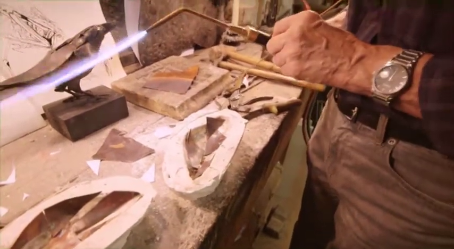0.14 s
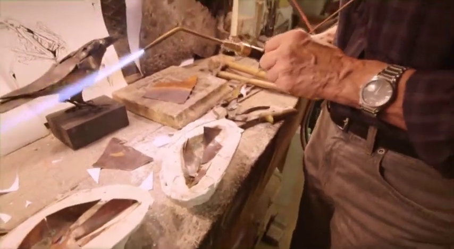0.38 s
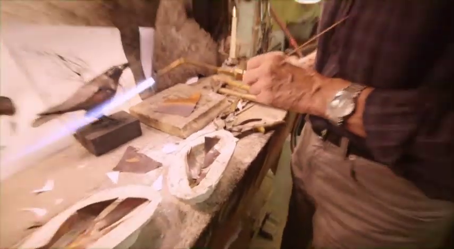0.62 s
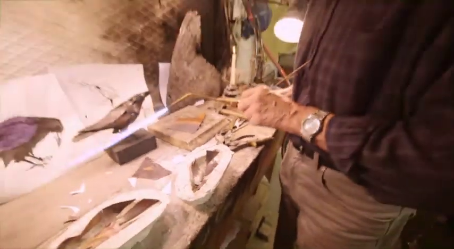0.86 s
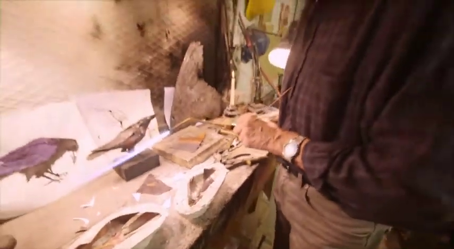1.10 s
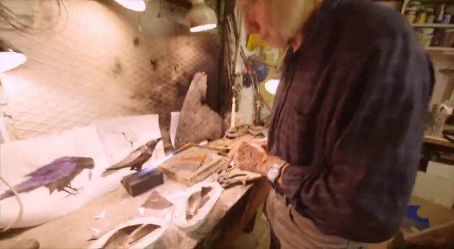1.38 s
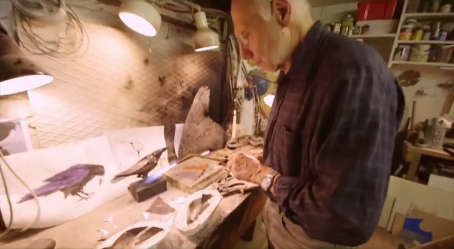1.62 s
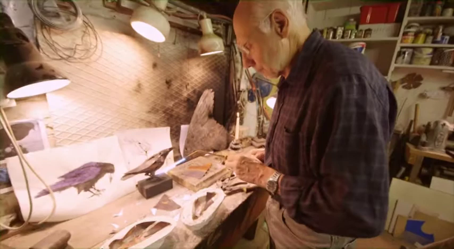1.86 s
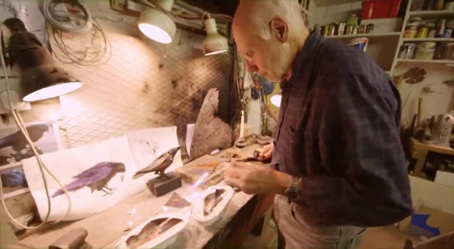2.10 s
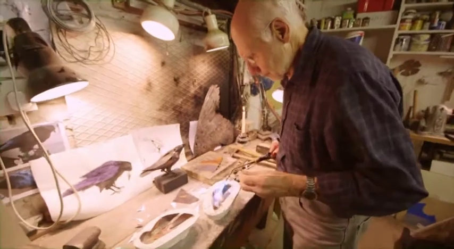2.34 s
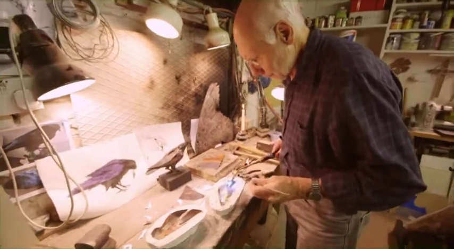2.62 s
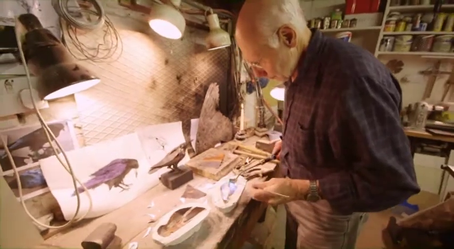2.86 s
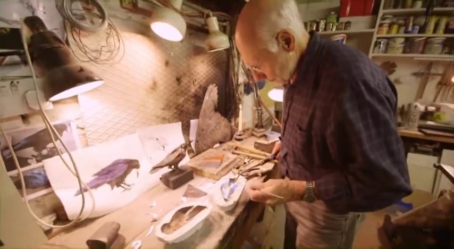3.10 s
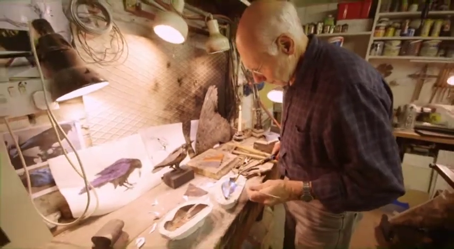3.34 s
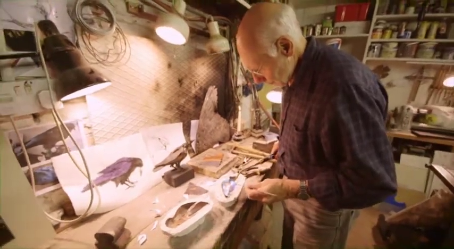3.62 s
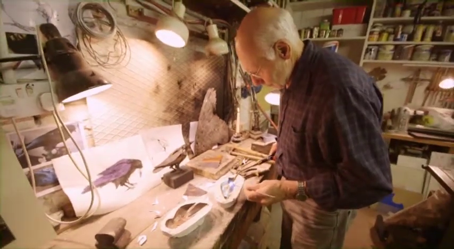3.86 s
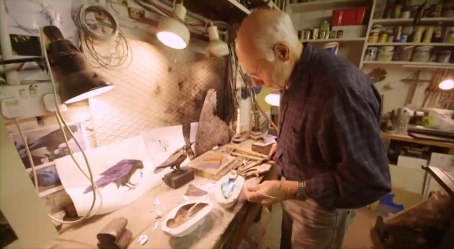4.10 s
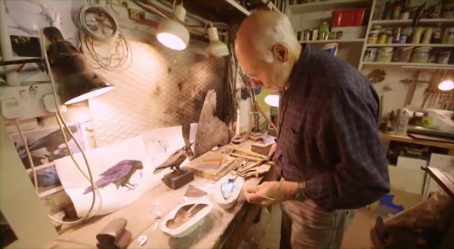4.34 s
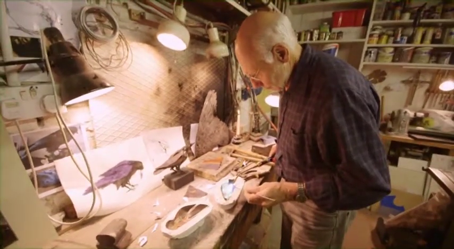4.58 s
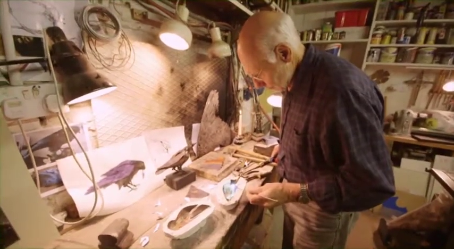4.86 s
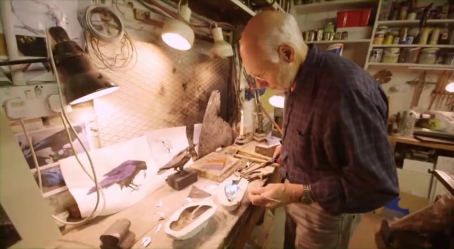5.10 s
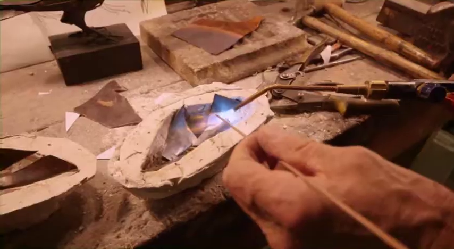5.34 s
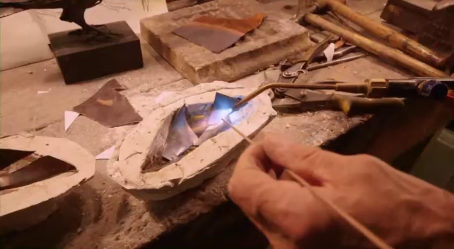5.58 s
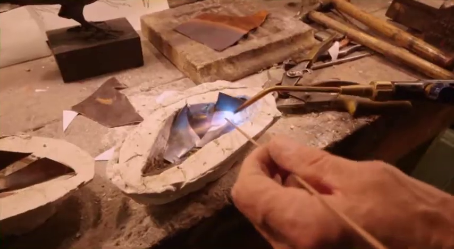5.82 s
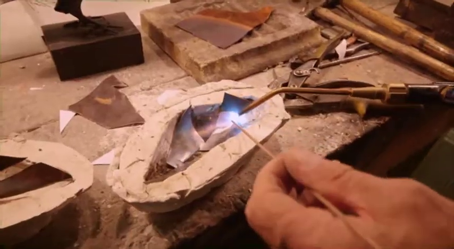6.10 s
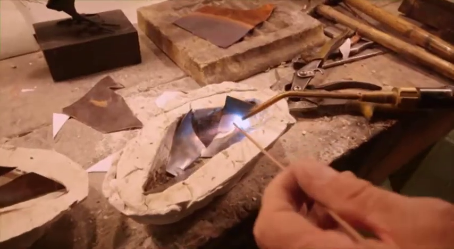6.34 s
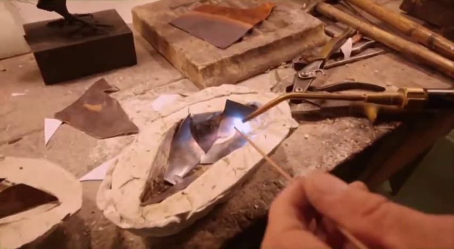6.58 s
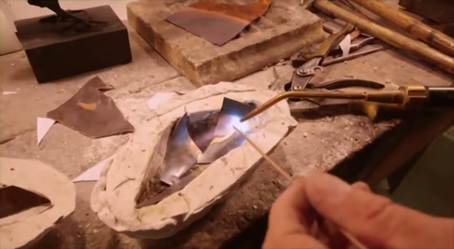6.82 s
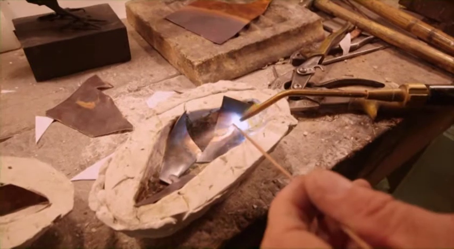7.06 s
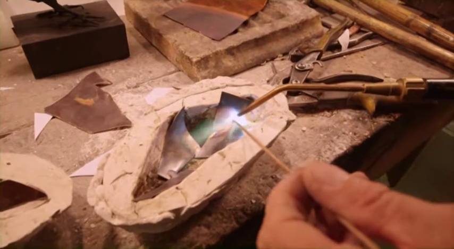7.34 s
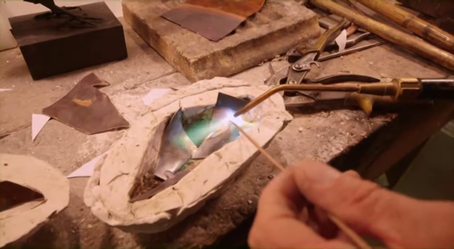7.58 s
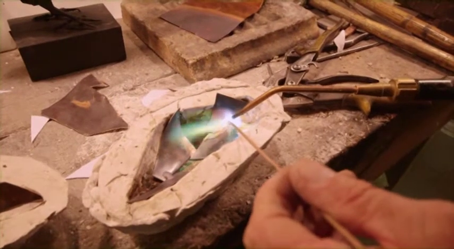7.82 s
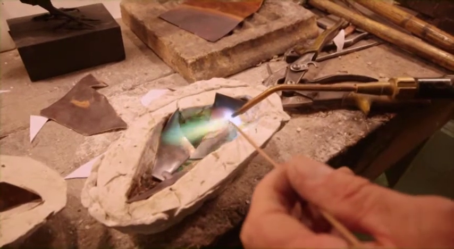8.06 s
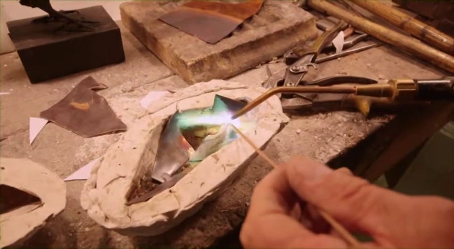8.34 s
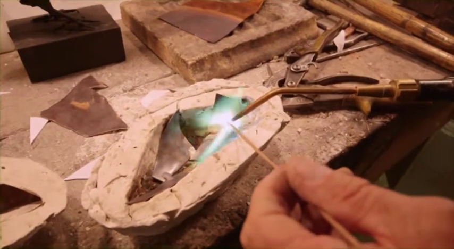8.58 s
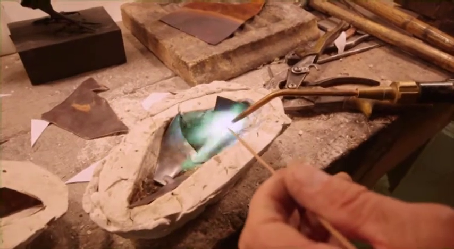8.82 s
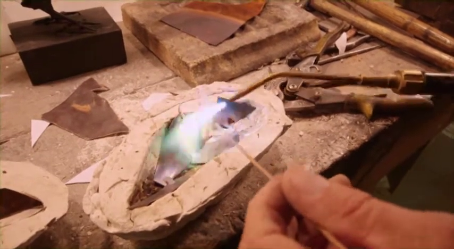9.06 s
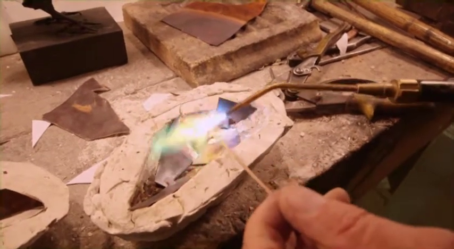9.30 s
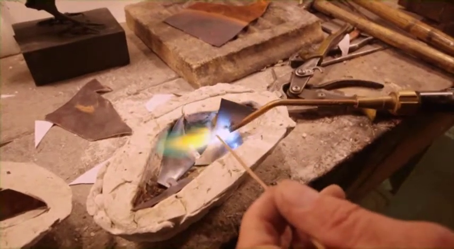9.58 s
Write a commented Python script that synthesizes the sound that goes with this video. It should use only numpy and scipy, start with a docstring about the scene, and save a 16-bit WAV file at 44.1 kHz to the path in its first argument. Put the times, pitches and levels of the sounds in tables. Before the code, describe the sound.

Close in a small, dry workshop, a gas torch burns without pause: a rough, fine buzz of about 265 ticks a second within bright hiss, over lumpy low rumble. Near 0.95 s a soft low thump and faint pop. At 1.4 s the flame leaps into a loud, throbbing roar, deep body and airy edge together, its edge brightening before it breaks off near 2.5 s. Gas then rushes into a hollow thin-metal shell, its resonance gliding up and back; sharp cracks and sputters cluster at 3.0-3.7 s, scatter around 4.0-4.3 s, and cluster again at 4.65-4.85 s, followed by low thumps and dull plops near 5 s. The rush fades by 5.9 s, leaving quieter buzzing hiss and rumble, with a deep hum slowly swelling. From 8.3 s the flame brushes the rim: plops, thumps, crackle, snaps around 8.75 s and a strong crack at 8.94 s. Softer hiss and small plops continue to 9.7 s.

```python
"""A gas torch burns close by on a workshop bench: a fine buzz of ticks over hiss and a low rumble of noise.
At 1.4 s the flame sweeps the bench in a throbbing two-band roar, then from 2.5 s plays into a hollow shell
of thin metal: resonant noise rushes, clumped bursts sputter, and sharp cracks pop over short rings.
From 6 s buzz and rumble carry on under a swelling hum; after 8 s the flame brushes the rim, with more pops.
Now and then come soft low thumps, a few sagging sine cycles each, and dull plops of molten metal."""
import sys
import numpy as np
from scipy import signal
from scipy.io import wavfile
from scipy.ndimage import uniform_filter1d

SR = 44100
rng = np.random.default_rng(int(sys.argv[2]) if len(sys.argv) > 2 else 0)


def file_out(sig):
    """Save sig as 16-bit WAV at sys.argv[1]."""
    # one column per channel
    cols = np.atleast_2d(sig).T
    # limit, then scale
    lim = np.clip(cols, -1, 1)
    pcm = np.round(lim * 32767).astype(np.int16)
    wavfile.write(sys.argv[1], SR, pcm)


def voltage_ratio(decibels):
    """Convert decibels (scalar or array-like) to amplitude ratios, 20 dB per decade."""
    exponent = np.asarray(decibels, float) / 20
    return 10 ** exponent


N = 427329  # length in samples


def evened(x):
    """Scales a sound to rms 1."""
    return x / np.sqrt(np.mean(x ** 2) + 1e-20)


def add(mix, start_s, sound):
    """Mixes a sound in at start_s, cut at the end of the mix."""
    part = mix[round(start_s * SR):][:len(sound)]
    part += sound[:len(part)]


def curve(rows, column=1, silent=None):
    """Draws one column of a table sample by sample; silent replaces the end values outside it."""
    rows = np.transpose(rows)
    return np.interp(np.arange(N) / SR, rows[0], rows[column], silent, silent)


def spell(start_s, end_s, rise_db_per_s, fall_db_per_s):
    """Attack, hold and release in dB: 0 from start to end, sloping away on both sides."""
    t = np.arange(N) / SR
    slopes = np.minimum((t - start_s) * rise_db_per_s, (end_s - t) * fall_db_per_s)
    return np.maximum(np.minimum(0, slopes), -120)


def shape(points, modes=()):
    """Minimum-phase impulse response of a colour curve, lifted by resonances; energy 1."""
    hz = abs(np.fft.fftfreq(4096, 1 / SR))
    point_hz, point_db = np.transpose(points)
    lift = 1 + sum(voltage_ratio(db) / (1 + ((hz - centre) / width * 2) ** 2) for centre, width, db in modes)
    colour_db = np.interp(np.log(hz + 1), np.log(point_hz + 1), point_db)
    log_gain = np.log(voltage_ratio(np.maximum(colour_db, -100)) * lift)
    taps = np.fft.ifft(np.exp(np.conj(signal.hilbert(log_gain)))).real[:2048]
    return taps / np.linalg.norm(taps)


def through(x, taps):
    """Convolution cut to the length of the scene."""
    return signal.oaconvolve(x, taps)[:N]


def resonate(x, hz, width_hz):
    """A gliding resonance: shifts the curve hz down to zero, smooths, and shifts back."""
    turn = np.exp(2j * np.pi * np.cumsum(hz) / SR)
    r = np.exp(-np.pi * width_hz / SR)
    return 2 * (turn * signal.lfilter([1 - r], [1, -r], x / turn)).real


def wander(hz):
    """Slow random curve of rms 1, moving at up to about hz."""
    return evened(signal.lfilter(*signal.butter(2, hz, fs=SR), rng.standard_normal(N)))


def flutter(hz, db):
    """Random gain wandering at up to about hz, by db rms."""
    return evened(voltage_ratio(db * wander(hz)))


def grit(per_s, spread_db):
    """Sparse clicks of random sign, a few of them large; rms 1."""
    size = voltage_ratio(spread_db * np.minimum(rng.exponential(1, N), 4)) * rng.choice([-1., 1.], N)
    return evened(size * (rng.random(N) < per_s / SR))


def room(x, t60_s):
    """Short, cluttered workshop: a dense decaying noise tail after a 4 ms gap."""
    t = np.arange(SR // 2) / SR
    tail = rng.standard_normal(len(t)) * voltage_ratio(-60 * t / t60_s) * (t > .004)
    return through(x, tail / np.linalg.norm(tail))


ROAR_START_S = 1.414
# Level of the rumble noise: start_s [s], level_db [dB]
RUMBLE_LEVEL = [(0, -34), (1.38, -35), (2.62, -33), (2.74, -37), (3.4, -40.5), (3.9, -37.5), (4.6, -38),
                (4.9, -32.5), (6.14, -39.5), (7.96, -36), (8.62, -31.5), (8.84, -37.5), (9.1, -38),
                (9.3, -39), (9.59, -37.5), (9.69, -45.5)]
# Colours of the rumble, free flame then flame on the work: freq_hz [Hz], level_db [dB, relative]
RUMBLE_COLOURS = [
    [(15, -45), (25, -8), (129, -5.5), (401, -18.5), (459, -21.5), (649, -17.5), (883, -26), (1270, -18.5),
     (2500, -40.5), (3250, -71), (5500, -120)],
    [(15, -45), (25, -9), (124, -6), (267, -10), (324, -10.5), (546, -9), (624, -19), (936, -15.5),
     (1900, -20.5), (2400, -27.5), (3250, -37.5), (5500, -120)],
]
# Resonant tones in the rumble: centre_hz [Hz], width_hz [Hz], added_db [dB against the colour]
RUMBLE_TONES = [(133, 9.4, 10), (927, 52, 2)]
# Swell of a deep hum, silent outside it: start_s [s], level_db [dB rms]
HUM_SWELL = [(6.2, -52.5), (8.3, -41), (8.9, -48)]
# Faint steady tones before the roar: pitch_hz [Hz], level_db [dB rms]
EARLY_TONES = [(398.4, -53), (786.0, -58)]


def rumble(hum_hz=51.6):
    """Lumpy low burning noise with resonant tones in it, a deep hum and faint early tones."""
    t = np.arange(N) / SR
    noise = rng.standard_normal(N) * flutter(20, .9) * voltage_ratio(curve(RUMBLE_LEVEL))
    free = t < ROAR_START_S
    body = sum(through(noise * part, shape(colour, RUMBLE_TONES))
               for part, colour in zip((free, ~free), RUMBLE_COLOURS))
    tones = free * sum(voltage_ratio(db) * np.sin(2 * np.pi * hz * t) for hz, db in EARLY_TONES)
    hum = voltage_ratio(curve(HUM_SWELL, 1, -120)) * np.sin(2 * np.pi * hum_hz * t)
    return body + np.sqrt(2) * (tones + hum)


# Soft low thumps: start_s [s], level_db [dB before the envelope], pitch_hz [Hz once settled]
LOW_THUMPS = [(0.919, 0, 124), (0.962, -8, 243), (2.94, -12, 115), (2.961, -9.5, 119), (3.919, -13.5, 125),
              (4.968, -10.5, 83), (5.064, -10, 132), (6.585, -12.5, 101.8), (8.316, -9.5, 134),
              (8.676, -11, 139), (8.717, -5, 118), (9.001, -17.5, 134)]


def thumps(sag=1.0, sag_s=0.0013, attack_s=0.0026, t60_s=0.038):
    """A few soft sine cycles whose pitch sags from double to its settled value."""
    out, t = np.zeros(N), np.arange(5000) / SR
    for start_s, level_db, pitch_hz in LOW_THUMPS:
        turns = np.cumsum(pitch_hz * (1 + sag * np.exp(-t / sag_s))) / SR
        envelope = voltage_ratio(level_db - 60 * t / t60_s) * (1 - np.exp(-t / attack_s))
        add(out, start_s, envelope * np.sin(2 * np.pi * turns))
    return out


# Dull plops of molten metal: start_s [s], level_db [dB before the decay], pitch_hz [Hz]
METAL_PLOPS = [(3.078, -13, 1760), (4.922, -20, 1090), (4.974, -10.5, 497), (5.066, -16, 926),
               (6.476, -28, 1600), (8.287, -17, 518.5), (8.32, -22, 550), (8.506, -17, 794),
               (8.582, -14, 533), (8.669, -10, 650), (8.691, -18, 700), (8.722, -12, 820),
               (8.998, -24, 500), (9.056, -23.5, 1454), (9.429, -25, 1300), (9.575, -29, 1890)]


def plops(t60_s=0.031, sharpness=2.4):
    """A fast-dying sine click and a puff of noise in a broad, dull resonance."""
    out, t = np.zeros(N), np.arange(2000) / SR
    puffs = rng.standard_normal((len(METAL_PLOPS), len(t)))
    for (start_s, level_db, pitch_hz), puff in zip(METAL_PLOPS, puffs):
        for _ in range(2):
            puff = resonate(puff, pitch_hz + 0 * t, pitch_hz / sharpness)
        click = voltage_ratio(-120 * t / t60_s) * np.sin(2 * np.pi * pitch_hz * t)
        add(out, start_s, voltage_ratio(level_db - 60 * t / t60_s) * (0.33 * evened(puff) + click))
    return out


# Pops and snaps: start_s [s], crack_db [dB before a 6 dB trim and colouring],
# body_db [dB against crack_db]
POP_HITS = [(0.9624, -22.5, -2), (2.262, -14, -1), (3.0194, -14, -31), (3.0715, -13, -15),
            (3.135, -17.5, -11), (3.2273, -10.5, -6), (3.2884, -6, -32), (3.316, -1.5, -6), (3.342, -2, -9),
            (3.627, -0.5, -15.5), (4.0394, -18.5, -14), (4.309, -16, -9), (4.3348, -13, -16),
            (4.6606, -9.5, -4), (4.6834, -1.5, -20), (4.718, -7, -12), (4.7504, -6, -29), (4.8, -4.5, -10),
            (4.8295, -5.5, -8), (8.644, -27, -25), (8.7634, -5.5, -12), (8.79, -10.5, -10),
            (8.812, -4, -4.5), (8.9367, 2, -19), (8.992, -18, -20)]
# Colour of the low puffs and pop bodies: freq_hz [Hz], level_db [dB, relative]
PUFF_COLOUR = [(59, -16), (100, -5), (381, 1.5), (768, -1.5), (931, -1), (1330, -0.5), (3500, -12.5),
               (4550, -14.5), (7700, -120)]
# Colour of cracks, sparks and specks: freq_hz [Hz], level_db [dB, relative]
SPARK_COLOUR = [(1180, -22), (2000, -20), (3050, -1.5), (5470, 5), (6220, 2), (7780, 6.5), (11500, 0),
                (15600, 0.5)]


def pops(crack_t60_s=.005, tail_t60_s=.03, ring_t60_s=.02):
    """A sharp crack of noise with a weak tail, and a slower ring of the shell below it."""
    cracks, rings = np.zeros((2, N))
    t = np.arange(3000) / SR
    noise = rng.standard_normal((len(POP_HITS), 2, len(t)))
    noise[:, 0, 0] = 5  # the first snap
    crack_decay = voltage_ratio(-60 * t / crack_t60_s) + voltage_ratio(-15 - 60 * t / tail_t60_s)
    for (start_s, crack_db, body_db), (crack, ring) in zip(POP_HITS, noise):
        add(cracks, start_s, voltage_ratio(crack_db - 6) * crack_decay * crack)
        add(rings, start_s, voltage_ratio(crack_db + body_db - 60 * t / ring_t60_s) * ring)
    return through(cracks, shape(SPARK_COLOUR)) + through(rings, shape(PUFF_COLOUR))


# Sputtering fits: start_s [s], hold_s [s], body_db [dB], crackle_db [dB against the body]
SPUTTER_FITS = [(3.306, 0.01, -20.5, -4), (3.352, 0.0048, -20.5, -3), (3.701, 0.051, -21.5, -13),
                (4.19, 0.031, -25, -2), (4.344, 0.015, -33.5, 2), (4.659, 0.024, -23.5, -3.5),
                (4.72, 0.138, -27, -0.5), (8.485, 0.17, -40, 5.5), (8.685, 0.086, -29.5, -2)]
# Resonances of the thin shell: centre_hz [Hz], width_hz [Hz], added_db [dB against the colour]
SHELL_MODES = [(950, 57, 4), (1209, 24, 2.5), (1466, 12, 5.5), (1800, 100, -4), (2500, 220, 3.5),
               (7850, 110, 7)]


def sputter(rise_db_per_s=646, fall_db_per_s=650):
    """Clumps of small explosions: a puff in the shell and bright crackle on top."""
    clumps = flutter(78, 3.5)
    body, crackle = np.zeros((2, N))
    for start_s, hold_s, body_db, crackle_db in SPUTTER_FITS:
        fit_db = body_db + spell(start_s, start_s + hold_s, rise_db_per_s, fall_db_per_s)
        fit = voltage_ratio(fit_db) * clumps
        body += fit
        crackle += fit * voltage_ratio(crackle_db)
    puff = through(body * rng.standard_normal(N), shape(PUFF_COLOUR, SHELL_MODES))
    sparks = .7 * rng.standard_normal(N) + .7 * grit(1500, 4)
    return puff + through(crackle * sparks, shape(SPARK_COLOUR))


# Flame striking the work, in the shell then on its rim, silent outside: start_s [s], level_db [dB]
RUSH_LEVELS = [
    [(2.45, -33), (2.6, -29), (2.78, -29), (2.92, -27.5), (3.03, -30), (3.17, -26), (3.4, -35.5),
     (3.63, -31.5), (3.8, -35.5), (4.6, -35), (4.81, -32), (5.47, -38.5), (5.71, -43.5), (5.9, -60)],
    [(8.1, -65), (8.374, -40), (8.7, -28.5), (8.9, -48), (9.2, -42), (9.3, -40.5), (9.42, -38), (9.69, -60)],
]
# Colours of the rush, in the shell then on its rim: freq_hz [Hz], level_db [dB, relative]
RUSH_COLOURS = [
    [(120, -36), (200, -18), (237, 0.5), (282, -9.5), (371, -2.5), (1640, -7), (7690, -15.5), (9120, -46),
     (12000, -15), (15600, -33), (22000, -120)],
    [(150, -33), (250, -2), (551, 4), (700, -24), (936, -7), (1800, -16), (2300, -32), (3900, -60),
     (6600, -120)],
]
# Broad peak gliding as the flame finds its place: start_s [s], pitch_hz [Hz], added_db [dB]
GLIDING_PEAK = [(2.6, 900, 7), (2.75, 1150, -0.5), (2.92, 1600, 7.5), (3.03, 2266, -8), (3.2, 2230, 0),
                (3.45, 1494, -1)]


def rush():
    """Gas rushing into the hollow shell, with fine grit burning off; later it brushes the rim."""
    inside, rim = (voltage_ratio(curve(level, 1, -120)) * flutter(27.5, 2.08) for level in RUSH_LEVELS)
    gas = through(inside * rng.standard_normal(N), shape(RUSH_COLOURS[0], SHELL_MODES))
    gas = gas + voltage_ratio(curve(GLIDING_PEAK, 2)) * resonate(gas, curve(GLIDING_PEAK), 640)
    specks = voltage_ratio(-11) * through(inside * grit(400, 5.4), shape(SPARK_COLOUR))
    return gas + specks + through(rim * rng.standard_normal(N), shape(RUSH_COLOURS[1]))


# Colour of the roar's body: freq_hz [Hz], level_db [dB, relative]
ROAR_BODY_COLOUR = [(18, -60), (30, -38), (129, 0), (206, -8.5), (243, -3), (339, -5), (447, -10.5),
                    (528, -7), (660, -7.5), (920, -14.5), (1260, -12), (1660, -28.5), (2500, -58),
                    (3250, -46), (5500, -120)]
# Colour of its upper edge: freq_hz [Hz], level_db [dB, relative]
ROAR_EDGE_COLOUR = [(880, -1), (1500, 5.5), (2090, -4), (2420, -3), (4350, -12.5), (9000, -23),
                    (11700, -53), (19800, -120)]


def roar(end_s=2.47, level_db=-11.5, cut_s=2.55):
    """Turbulent flame: large eddies make body and upper edge throb together."""
    held_db = level_db + spell(ROAR_START_S, end_s, 820, 104)
    cut_db = spell(0, cut_s, 1, 900)  # the fading roar breaks off
    level = voltage_ratio(held_db + cut_db) * flutter(42.0, 1.3)
    body = through(level * rng.standard_normal(N), shape(ROAR_BODY_COLOUR))
    # the edge gains 7.5 dB in the last 0.24 s of the hold, as the flame nears the shell
    nearing = np.clip(1 + (np.arange(N) / SR - end_s) / 0.24, 0, 1)
    edge = voltage_ratio(-14 + 7.5 * nearing) * flutter(93.0, 2.2)
    return body + through(level * edge * rng.standard_normal(N), shape(ROAR_EDGE_COLOUR))


# Beat of the ticks: start_s [s], rate_hz [ticks a second]
TICK_BEAT = [(0, 264), (.5, 265), (1.3, 297), (1.42, 268), (2.6, 234), (4.9, 263), (9.69, 269)]
# Very short echoes of each tick: delay_s [s], gain [loop factor]
TICK_ECHOES = [(.00011, .6), (.00023, .6), (.00041, .5)]
# Changes of colour: start_s [s], colour [0 to 2, blending between], hiss_db [dB against the ticks]
COLOUR_CHANGES = [(1.9, 0, -8), (2.5, 1, -2), (5.2, 1, -2), (6.0, 2, -3)]


def tick_train(jitter_s=.00035, uneven_db=2.0, weak_db=-2):
    """Alike ticks on a shaky beat, strong-weak, failing in spells, smeared by echoes; rms 1."""
    turns = np.cumsum(curve(TICK_BEAT)) / SR
    at = np.flatnonzero(np.diff(np.floor(turns)))
    late, size, luck = rng.standard_normal((len(at), 3)).T
    luck = evened(luck + uniform_filter1d(luck, size=9) * .6)  # neighbours fail together
    # strength has a ceiling and many failures, and is steadier in the later colours
    fires = 1 / (1 + np.exp(-3 * (luck + .45 + .45 * curve(COLOUR_CHANGES)[at])))
    strength = fires * voltage_ratio(uneven_db * size + weak_db * (np.arange(len(at)) % 2))
    ticks = np.zeros(N)
    ticks[np.clip(at + (late * jitter_s * SR).astype(int), 0, N - 1)] = strength
    for delay_s, gain in TICK_ECHOES:  # all-pass loops spread each tick without colouring it
        loop = np.r_[1, np.zeros(round(delay_s * SR) - 1), gain]
        ticks = signal.lfilter(loop[::-1], loop, ticks)
    return evened(ticks)


# Buzz of ticks before colouring: start_s [s], level_db [dB]
BUZZ_LEVEL = [(0, -34.5), (1.3, -31.5), (1.43, -27.5), (1.7, -31.5), (2.1, -31), (2.6, -40.5), (3.1, -38),
              (3.5, -44.5), (4.7, -39), (5.34, -42.5), (6.2, -41), (8.66, -35.5), (8.79, -35.5),
              (8.83, -39), (9.05, -45), (9.69, -45)]
# The three colours of ticks and hiss: freq_hz [Hz], level_db [dB, relative]
BUZZ_COLOURS = [
    [(1180, -58), (2000, -9.5), (2870, -7.5), (3100, -2), (4450, -6.5), (5810, -1), (6780, -13.5),
     (7980, -7), (8700, -10), (9400, -6.5), (11000, -4), (15600, -7)],
    [(5000, 4.5), (8500, 1.5), (9290, 2), (9750, 5), (12500, -2), (13400, -1), (15600, 6)],
    [(1470, -40), (2500, -12.5), (3120, -4.5), (3530, -12), (3810, -3), (4500, -17), (5300, -7.5),
     (6820, -11), (9700, -0.5), (10050, -10), (10400, -1), (11200, -9.5), (11700, 5), (15600, -10)],
]
# Fine rings in the last colour: centre_hz [Hz], width_hz [Hz], added_db [dB against the colour]
NEAR_RINGS = [(5100, 1500, 7.5), (7750, 210, 6), (12430, 180, 3), (14800, 250, 3), (15100, 190, 11)]
# Rings in the first colour: centre_hz [Hz before drift], width_hz [Hz], added_db [dB before swelling]
EARLY_RINGS = [(8900, 500, -3), (10300, 800, 1), (11500, 800, 3), (12600, 700, 1), (13600, 700, 0),
               (15100, 700, 0)]
# Early rings sliding together: start_s [s], pitch [factor]
RING_DRIFT = [(0, .985), (1.75, .995), (2.3, 1.06)]
# Rings gliding as the colour changes: start_s [s], pitch_hz [Hz], added_db [dB against the drive]
GLIDING_RINGS = [
    [(1.9, 11200, -8), (2.5, 12000, 5), (3.2, 12450, 8), (5.3, 12450, 8), (6.2, 13700, 3), (8.5, 13900, 3),
     (9.1, 13200, 3)],
    [(5.3, 11600, -12), (5.6, 11800, 4), (6.5, 13000, 1), (8.4, 12900, 1), (9.2, 12500, 1)],
]


def hiss():
    """A fine buzz of ticks over smooth hiss, whose colour changes, with gliding rings."""
    which, hiss_gain = curve(COLOUR_CHANGES), voltage_ratio(curve(COLOUR_CHANGES, 2))
    drive = voltage_ratio(curve(BUZZ_LEVEL)) * (tick_train() + hiss_gain * rng.standard_normal(N))
    coloured = []
    for k, (colour, modes) in enumerate(zip(BUZZ_COLOURS, ((), (), NEAR_RINGS))):
        share = np.sqrt(np.clip(1 - abs(which - k), 0, 1))  # equal-power crossfade
        coloured.append(through(drive * share, shape(colour, modes)))
    first, second, third = coloured
    slid = np.zeros(N)
    for centre_hz, width_hz, added_db in EARLY_RINGS:  # each swells and wavers by itself
        swell = voltage_ratio(added_db + 3.5 * wander(2.8))
        pitch_hz = centre_hz * curve(RING_DRIFT) * (1 + .008 * wander(2))
        slid += swell * resonate(first, pitch_hz, width_hz)
    glides = sum(voltage_ratio(curve(ring, 2)) * resonate(drive, curve(ring), 370) for ring in GLIDING_RINGS)
    return voltage_ratio(-6) * (first + slid) + second + third + glides


def scene():
    """All sources, the sharp ones with a little room."""
    hits = pops() + plops() + thumps() + sputter()
    wet = voltage_ratio(-16) * room(hits, .15)
    return (hits + wet + hiss() + rumble() + roar() + rush())[None]


def low_pass(x):
    """Removes everything above the highest recorded frequency."""
    return signal.sosfilt(signal.butter(12, 16800, fs=SR, output="sos"), x)


def record(dry):
    """A soft ceiling on the loudest peaks, then a steep band edge at 15.8 kHz."""
    held = dry / (1 + (dry / .9) ** 4) ** .25
    edge = signal.firwin(511, 15800, fs=SR)
    mix = signal.oaconvolve(held, edge[None], "same")
    return low_pass(mix)


dry = scene()
out = record(dry)
file_out(out)
```